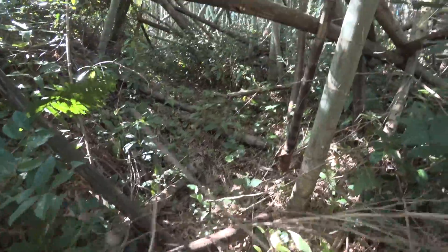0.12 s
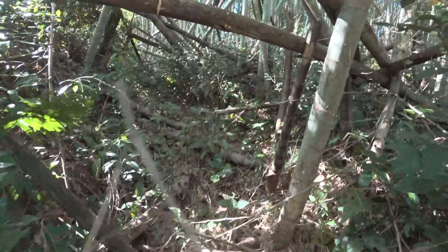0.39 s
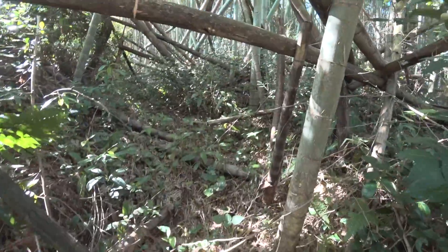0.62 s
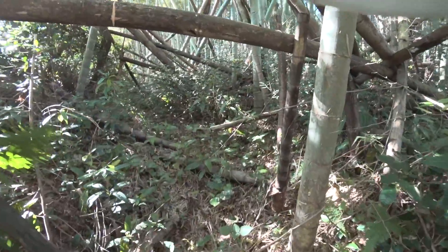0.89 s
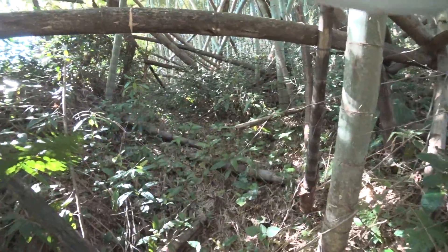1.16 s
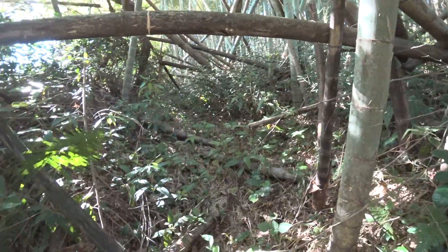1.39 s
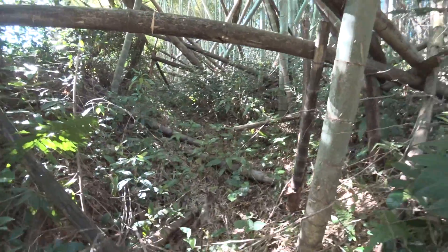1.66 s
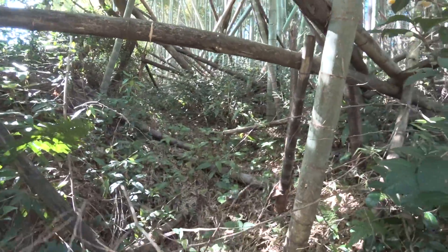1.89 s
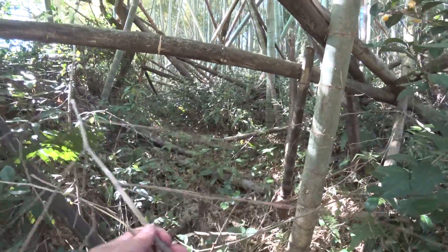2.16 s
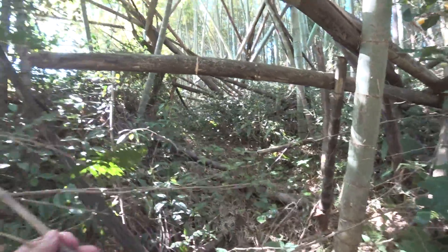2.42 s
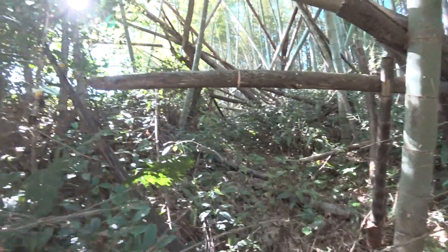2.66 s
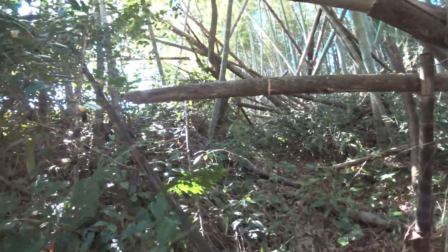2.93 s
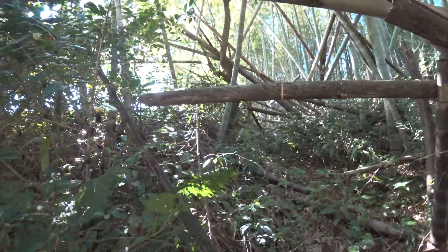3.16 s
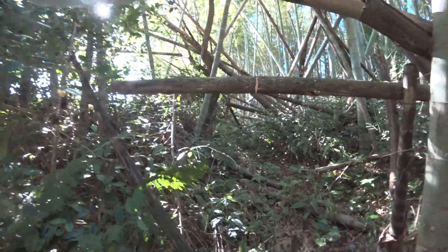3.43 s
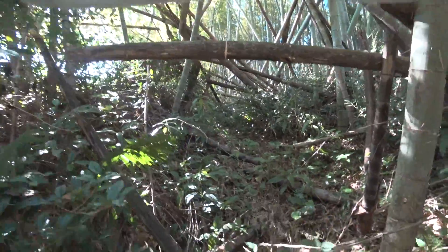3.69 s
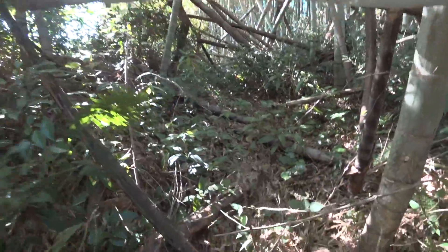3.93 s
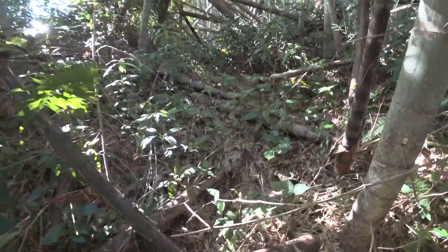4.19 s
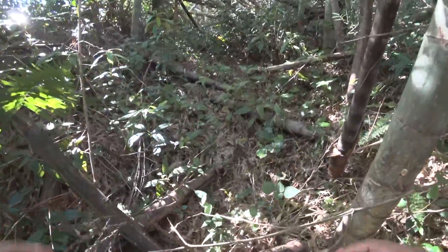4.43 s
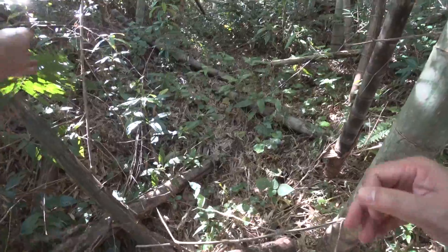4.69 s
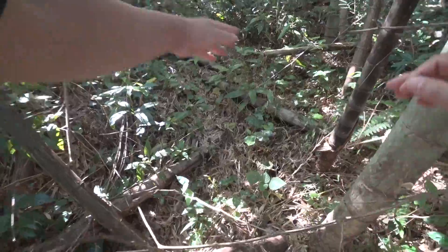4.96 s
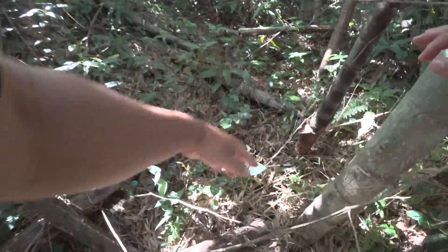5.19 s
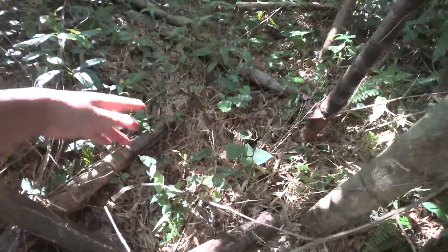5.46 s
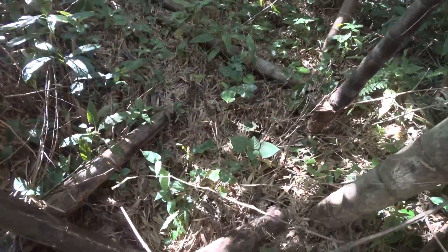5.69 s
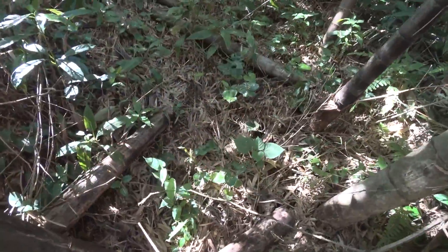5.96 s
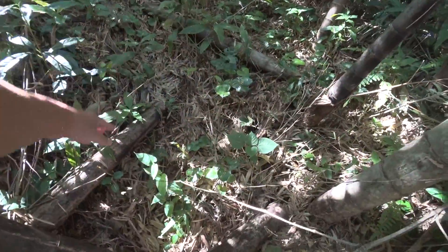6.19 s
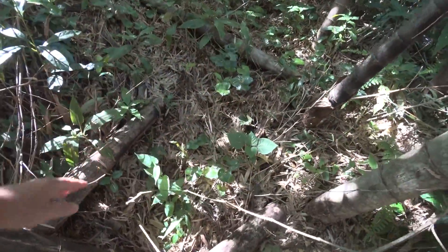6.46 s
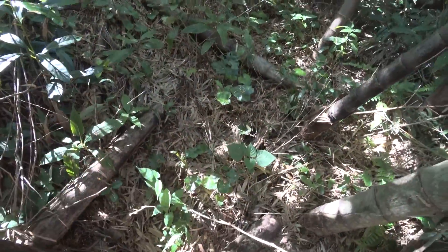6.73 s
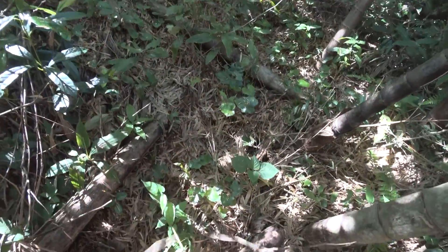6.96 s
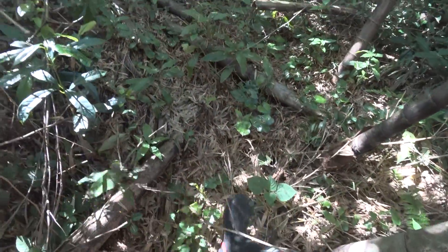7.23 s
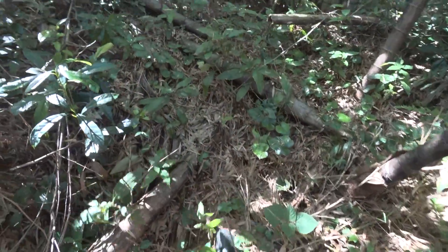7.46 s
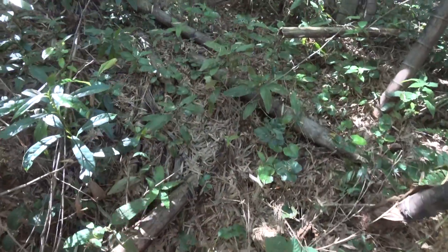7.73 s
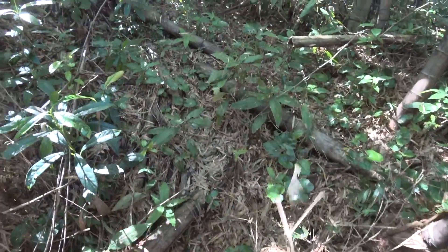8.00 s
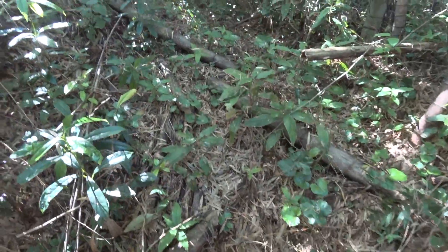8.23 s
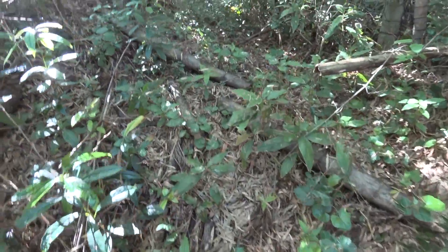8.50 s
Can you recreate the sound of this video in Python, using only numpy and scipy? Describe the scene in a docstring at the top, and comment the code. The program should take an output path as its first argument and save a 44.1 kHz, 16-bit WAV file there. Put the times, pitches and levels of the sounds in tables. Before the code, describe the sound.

Outdoors in a bamboo grove, heard from a small head-worn stereo microphone: thin in bass, softened at the very top, with a faint steady hiss throughout. From 0 to 1 s dry leaves rustle and crackle closely amid rapid bright twig snaps. It eases, with a barely audible creak near 1.4 s, then hollow stems crack at 1.6 to 1.8 s. Rustling swells around 2.6 to 3.6 s, with a strong woody knock at 3.7 s and more snaps until 4.6 s. From 4.7 to 6.6 s it is much quieter: faint brushing, small ticks, a tiny creak at 4.75 s, one isolated sharp snap at 5.5 s. Crunching resumes at 6.7 s; low hollow knocks and dense cracks cluster from 7.0 s, peaking in a loud leafy crunch near 7.4 s. After a brief dip, another crackling burst comes at 7.95 to 8.25 s, with a hard knock at 8.2 s, then near quiet and a last snap at 8.6 s.

```python
"""Dry bamboo litter rustles and crackles at once, close by, over a faint steady wash; twigs soon snap.
Someone wades through it and pushes dead branches aside, a small camera worn on the head.
Leaves are crackle bursts and hiss shaped by sweeps, twigs are coloured noise with a sharp crack,
hollow stems are partials set ringing by tearing noise, and creaks are stick-slip scrapes into stem modes.
The grove scatters snaps, knocks and creaks back; two microphone ports hear it all, bass cut, treble ending early."""
import sys
import numpy as np
from scipy import signal
from scipy.fft import rfft, irfft
from scipy.io import wavfile
from scipy.ndimage import uniform_filter1d

SR = 44100
rng = np.random.default_rng(int(sys.argv[2]) if len(sys.argv) > 2 else 0)


def nominal_scale(level):
    """Amplitude ratio for a level in decibels (scalar or array-like)."""
    x = np.asarray(level, float) / 20
    return 10 ** x


def wav_record(signal):
    """Record a signal, one row per channel, as 16-bit PCM in the file named by sys.argv[1]."""
    frames = np.transpose(np.atleast_2d(signal))
    bounded = np.clip(frames, -1, 1)
    # unit amplitude maps onto the largest positive 16-bit level
    quanta = np.round(bounded * 32767).astype(np.int16)
    wavfile.write(sys.argv[1], SR, quanta)


N = 380141  # length in samples


def evened(x):
    """Scales a signal to an rms of 1."""
    return x / np.sqrt(np.mean(x ** 2) + 1e-20)


def read(points, hz):
    """Reads a curve of (Hz, value) points along a logarithmic frequency axis."""
    f, value = np.transpose(points)
    return np.interp(np.log(hz + 1), np.log(f + 1), value)


def add(mix, s, sound):
    """Lays a sound into the mix from second s, cut at the end."""
    part = mix[:, round(s * SR):][:, :sound.shape[1]]
    part += sound[:, :part.shape[1]]


def sided(sound, pan_db):
    """Places a sound by level alone: pan_db is left over right."""
    return sound * nominal_scale(np.array([[.5], [-.5]]) * pan_db)


def below(hz, knee_hz=1700):
    """1 in the low range, 0 in the treble."""
    return 1 / (1 + (hz / knee_hz) ** 4)


def causal(gain_db):
    """Minimum phase: an impulse response of this colour with its energy as early as possible."""
    log_gain = np.log(nominal_scale(np.r_[gain_db, gain_db[-2:0:-1]]))
    return np.fft.ifft(np.exp(np.conj(signal.hilbert(log_gain)))).real


# A foot, hand or branch sweeping through leaves. Each row: loudest moment in seconds, seconds to rise 10 dB,
# seconds to fall 10 dB (both at least 5 ms, then stretched by lingers), level in dB, weight below 1.7 kHz in dB.
SWEEPS = [(0.0, .05, 0.07, -27.5, -7.5), (0.13, 0.7, 0.4, -28.5, -9), (0.447, 0.08, 0.25, -26.5, -6),
          (0.69, 0, 0.22, -28, -9.5), (1.18, 0, 1.5, -43, -6.5), (1.4, 0.2, 0, -40.5, -1),
          (1.669, 0.07, 0.06, -29.5, -6), (1.84, 0, 0.0356, -26.5, -1), (1.99, 0.1, 0.03, -33, -14.5),
          (2.094, 0.03, -0.05, -29.5, -23), (2.2, 0.66, 0.5, -42, -4.5), (2.64, 0.25, 0.17, -26, -8),
          (2.761, -0.01, 0.15, -30, -7), (2.948, 0.08, 0.06, -30, -9.5), (3.067, 0.035, 0.08, -25, -13.5),
          (3.39, 0.19, 0.17, -33.5, -8.5), (3.569, 0.25, 0.22, -27.5, -9), (3.899, -0.1, -0.06, -33.5, 2.5),
          (4.16, 0.11, 0.13, -34.5, -3), (4.442, 0.09, -0.01, -33.5, -5.5), (4.541, 0.5, 0.14, -44.5, -5),
          (4.578, 0.05, 0.04, -32, 0), (4.74, 0.16, 0.26, -51.5, 6), (4.87, 0.14, 0.16, -43.5, -12.5),
          (5.0, 0, 0.11, -44, -8.5), (5.106, 0.16, 0.12, -38.5, -6.5), (5.29, 0.05, 0.3, -44, -11),
          (5.76, -0.25, 0.1, -44, -11), (6.1, 0.67, 0.14, -50.5, -2), (6.489, 0.02, 1.5, -41.5, -8),
          (6.7, 0.1058, -0.1, -32.5, -6), (6.78, 0.1023, -0.01, -32, 0.5), (7.093, 0.12, 0.5, -32, 1.5),
          (7.18, 0.0748, -0.25, -41.5, 10), (7.26, 0.0328, 0.01, -30.5, -4.5),
          (7.359, 0.04, 0.04, -19.5, -3.5), (7.469, -0.05, 0.0154, -26, -24), (7.68, 0.05, 0, -42, -11.5),
          (7.965, -0.0474, 0.09, -25.5, -1.5), (8.09, 0.02, -0.02, -38, -8.5),
          (8.21, -0.03, 0.08, -33, -5.5), (8.62, 0.06, -1, -44.5, 0)]


def stirring_db(t, peaks_db, lingers=1):
    """Level of all sweeps together: each rises to its peak and falls away, their powers add."""
    at, rise, fall = np.transpose(SWEEPS)[:3, :, None]
    before = (at - t) / np.maximum(rise, .005)
    after = (t - at) / np.maximum(fall, .005)
    away = np.where(t < at, before, after)
    each_db = peaks_db[:, None] - 10 * away / lingers
    return 10 * np.log10(nominal_scale(2 * each_db).sum(0))


def crackle(per_s, spread_db, clump_db, width, longest_s, count=40):
    """Leaf fractures: short bursts of many colours and directions, coming in clumps."""
    clumps = nominal_scale(clump_db * evened(uniform_filter1d(rng.standard_normal(N), 500)))
    strength = nominal_scale(spread_db * np.minimum(rng.exponential(1, N), 4))
    breaks = strength * (rng.random(N) < per_s * clumps / SR)
    kind = rng.integers(0, count, N)
    t, hz = np.arange(1024) / SR, np.fft.rfftfreq(1024, 1 / SR)
    out = np.zeros((2, N))
    for k in range(count):
        centre_hz = 450 * 24 ** rng.random()
        t60 = longest_s * rng.uniform(0.5, 1)
        pan_db = 3 * rng.standard_normal()
        hump = 0.37 + np.exp(-(np.log((hz + 1) / centre_hz) / width) ** 2)
        coloured = irfft(rfft(rng.standard_normal(1024)) * hump)
        burst = evened(coloured * nominal_scale(-60 * t / t60))
        out += sided(signal.oaconvolve(breaks * (kind == k), burst)[:N], pan_db)
    return evened(out)


# Colour of the stirred leaves. Each row: frequency in Hz, relative level in dB per Hz.
LEAF = [(24, -67), (40, -13), (191, -49), (427, -6.5), (610, -15), (870, -14), (1430, -7), (1950, -9),
        (2650, 2), (3600, 2.5), (5500, 4), (9290, -2), (10500, 2.5), (11500, -6.5), (15000, -37),
        (22000, -120)]
# Where the stirring is; near leaves are brighter.
# Each row: time in seconds, left over right in dB, sheen above 5.5 kHz in dB.
PLACE = [(0.0, 0.5, 4), (0.4, -2, -5), (1.08, -0.5, -2), (1.66, 1, -2.5), (1.9, 0.5, -2), (2.1, 1.5, 4.5),
         (2.6, -5.5, -7.5), (3.08, 2.5, 1.5), (3.6, 3, -4.5), (4.44, 0, -4.5), (4.78, -2.5, 2.5),
         (5.05, 1, -0.5), (5.35, 1.1, -4), (5.7, 0, -4), (6.7, -0.84, -6.5), (7.2, -2, 1.5),
         (7.6, 0.5, 4.5), (8.0, -1, -6), (8.62, -2.1, -3.5)]
WEIGHT_LINGERS, SHEEN_LINGERS = 0.92, 1.053  # swell and fade times of low and high range, middle = 1
USUAL_WEIGHT_DB = -14.5  # a sweep of this weight keeps the leaf colour's own lows


def rustle(hiss_db=-7, crackle_db=-2, tick_db=-9, patchy_db=1.6, flicker_db=1.1):
    """Sliding leaves hiss in patches under the crackle; both take the colour and level of the sweeps."""
    leaves = nominal_scale(crackle_db) * crackle(1200, spread_db=2.5, clump_db=2, width=0.24, longest_s=0.022)
    # dry ticks
    leaves += nominal_scale(tick_db) * crackle(80, spread_db=2.5, clump_db=2, width=0.8, longest_s=0.005, count=20)
    leaves += nominal_scale(hiss_db) * rng.standard_normal(N)
    hz, t, z = signal.stft(leaves, SR, nperseg=256, noverlap=192)

    grain = rng.standard_normal((len(t), len(hz)))
    patches = evened(uniform_filter1d(uniform_filter1d(grain, 14, 0), 8, 1)).T
    flicker = evened(uniform_filter1d(rng.standard_normal(len(t)), 8))

    *_, peaks_db, weights_db = np.transpose(SWEEPS)
    s, *columns = np.transpose(PLACE)
    pan_db, sheen_db = (np.interp(t, s, c) for c in columns)
    level_db = stirring_db(t, peaks_db)
    low_db = stirring_db(t, peaks_db + weights_db, WEIGHT_LINGERS) - USUAL_WEIGHT_DB
    high_db = stirring_db(t, peaks_db, SHEEN_LINGERS) + sheen_db

    colour_db = read(LEAF, hz)
    # level the colour by its power in bins 12 to 63, about 2 to 11 kHz
    colour_db = colour_db - 10 * np.log10(np.mean(nominal_scale(2 * colour_db[12:64])) * 52 / len(hz))
    field_db = colour_db[:, None] + level_db
    field_db += below(hz)[:, None] * (low_db - level_db)
    field_db += (1 - below(hz, knee_hz=5500))[:, None] * (high_db - level_db)
    field_db += patchy_db * patches + flicker_db * flicker
    z *= nominal_scale(field_db + np.array([.5, -.5])[:, None, None] * pan_db)
    return signal.istft(z, SR, nperseg=256, noverlap=192)[1][:, :N]


# Far leaves and microphone hiss. Each row: frequency in Hz, relative level in dB per Hz.
STILL = [(15, -59), (25, -29), (456, -9), (1060, -5), (1950, -7), (5970, 0), (11000, -15), (14300, -45),
         (22000, -120)]


def still():
    """The steady faint wash under everything: coloured noise, mostly independent at the two ports."""
    hz = np.fft.rfftfreq(N, 1 / SR)
    noise = rng.standard_normal(N) + 3.0 * rng.standard_normal((2, N))
    wash = irfft(rfft(noise) * nominal_scale(read(STILL, hz)), N)
    return nominal_scale(-52.5) * evened(wash)


def rumble():
    """The camera mount shakes a little with the walker's movement: lumpy, very low noise."""
    t = np.arange(0, N, 256) / SR
    *_, peaks_db, weights_db = np.transpose(SWEEPS)
    low_db = stirring_db(t, peaks_db + weights_db, WEIGHT_LINGERS)
    shake_db = np.interp(np.arange(N) / SR, t, low_db)
    lumps_db = 5 * evened(uniform_filter1d(rng.standard_normal(N), 2000))
    noise = rng.standard_normal(N) + 0.35 * rng.standard_normal((2, N))
    band = signal.butter(2, [45, 137], "band", fs=SR, output="sos")  # Hz
    low = evened(signal.sosfilt(band, noise))
    return low * nominal_scale(-55.5 + 0.64 * shake_db + lumps_db)


# Twigs and leaf ribs breaking close by. Each row: start in seconds, peak of the 3 ms rms in dB,
# brightest frequency in Hz, tail's 60 dB decay in seconds (held to 0.006-0.2), left over right in dB.
SNAPS = [(0.0752, -22, 5640, 0.088, -6), (0.109, -18, 5580, 0.07, -5), (0.1422, -13, 5150, 0.037, 3),
         (0.2091, -9.5, 4200, 0.013, 7), (0.2714, -15.5, 2800, 0.053, -1), (0.302, -25.5, 8500, 0.04, -2),
         (0.365, -26, 8600, 0.015, 1), (0.444, -21, 9600, 0.03, 4.5), (0.4575, -9.5, 5760, 0.021, 8),
         (0.552, -19, 3430, 0.02, -3), (0.5854, -11, 5600, 0.017, 1), (0.6627, -22, 2980, 0.095, -13),
         (0.727, -11, 3420, 0.0077, 3), (0.7529, -13.5, 3300, 0.015, 1), (0.813, -21.5, 3220, 0.052, 6),
         (0.9767, -25.5, 4440, 0.027, 1), (1.1735, -28, 5830, 0.052, -1), (1.2722, -15, 4930, 0.024, -1),
         (1.4678, -25.5, 4300, 0.053, -5), (1.5767, -11, 2500, 0.072, 3.5), (1.635, -31, 3400, 0.02, 0),
         (1.645, -16.5, 3600, 0.03, 5), (1.6545, -13.5, 6540, 0.033, -1), (1.666, -16, 2900, 0.029, 13),
         (1.69, -10, 4700, 0.047, 3), (1.738, -27, 4550, 0.053, 4), (1.8035, -21, 3300, 0.042, 2),
         (1.8149, -10.5, 5500, 0.074, 2), (1.9785, -23.5, 6000, 0.16, 4), (2.0107, -23.5, 5300, 0.13, 7),
         (2.2146, -29.5, 2550, 0.17, -11), (2.4328, -24, 7060, 0.008, 2), (2.4455, -25, 6100, 0.041, 19),
         (2.4868, -25, 6160, 0.03, 13), (2.6062, -18, 7500, 0.0092, 7), (2.638, -21, 4150, 0.039, -9),
         (2.8, -22.5, 3000, 0.01, -2), (2.833, -23, 7140, 0.026, -3), (2.935, -15, 5800, 0.023, 1),
         (2.9438, -17, 4960, 0.011, 2), (2.985, -16.5, 8800, 0.034, 2.5), (3.0545, -15.5, 5360, 0.073, 3),
         (3.211, -15.5, 5850, 0.016, 0), (3.372, -32, 5000, 0.02, -14), (3.491, -24.5, 4870, 0.2, 10.5),
         (3.531, -25, 3000, 0.055, 17), (3.683, -21.5, 2300, 0.014, -3.5), (3.8068, -23, 4470, 0.025, 4),
         (3.8526, -21.5, 4140, 0.021, -2), (3.8839, -23.5, 4600, 0.026, -0.5),
         (3.902, -15, 4640, 0.012, -3), (3.918, -10.5, 3300, 0.0086, -1), (3.9448, -28, 1580, 0.015, 0),
         (4.013, -19, 2200, 0.011, -1), (4.058, -18.5, 2980, 0.0069, -2.5),
         (4.126, -28.5, 3600, 0.0073, -2.5), (4.1394, -27, 2370, 0.011, -1),
         (4.1458, -12.5, 4400, 0.085, -4.5), (4.2197, -19, 2650, 0.016, 4),
         (4.2236, -23.5, 5900, 0.026, -5.5), (4.455, -13.5, 5800, 0.0084, 0),
         (4.5535, -19, 4540, 0.029, -11), (4.5549, -11, 4560, 0.041, -4), (4.889, -34.5, 3500, 0.027, -9),
         (5.019, -26.5, 4170, 0.012, 4), (5.105, -33, 6460, 0.019, 7), (5.492, -25.5, 3030, 0.007, 3),
         (5.4938, -10.5, 6600, 0.013, 4.5), (5.747, -32.5, 4440, 0.027, 5),
         (5.7519, -31.5, 4100, 0.047, -6), (6.04, -36.5, 5100, 0.025, -9.5), (6.083, -41, 4000, 0.023, -8),
         (6.2058, -38.5, 5700, 0.028, -6.5), (6.348, -38, 5940, 0.05, -0.5), (6.4419, -33, 5130, 0.022, 1),
         (6.6947, -17.5, 3840, 0.04, -2), (6.7641, -20.5, 2500, 0.045, 0), (6.797, -27.5, 1520, 0.035, 8),
         (7.0384, -10, 2170, 0.024, 2), (7.076, -20.5, 1900, 0.049, 12.5), (7.0882, -10.5, 1700, 0.05, -4),
         (7.114, -21, 1500, 0.03, 2), (7.1219, -20.5, 4240, 0.085, -2), (7.1404, -21, 6440, 0.031, 5),
         (7.159, -34, 2800, 0.015, 0), (7.1746, -14, 4300, 0.031, -3), (7.2318, -24, 3660, 0.017, -1),
         (7.2406, -11, 4000, 0.027, 0), (7.268, -15.5, 2300, 0.024, 2), (7.2765, -12.5, 4930, 0.034, 7),
         (7.319, -18.5, 3870, 0.046, 0), (7.339, -13, 6340, 0.11, 3), (7.4677, -23, 4620, 0.13, 1),
         (7.567, -34, 8000, 0.02, 0), (7.6753, -36.5, 6670, 0.011, -14), (7.736, -27, 2070, 0.037, 3),
         (7.8057, -25, 6740, 0.017, 0), (7.878, -38, 5640, 0.043, 3), (7.9514, -10, 3600, 0.11, -5),
         (7.9763, -10.5, 3300, 0.047, -5), (8.0071, -17.5, 3640, 0.088, -5),
         (8.0161, -11.5, 2440, 0.094, -5.5), (8.0556, -13.5, 5200, 0.076, -7),
         (8.0624, -17, 3330, 0.052, -10), (8.0836, -20.5, 3200, 0.028, -16),
         (8.09, -12.5, 3180, 0.049, -5.5), (8.1338, -28, 2860, 0.032, -3), (8.1578, -26, 3170, 0.021, -4.5),
         (8.1743, -17.5, 2970, 0.019, -2), (8.1965, -17, 5500, 0.021, 3), (8.2097, -19.5, 4240, 0.019, -1),
         (8.2228, -27.5, 4520, 0.02, -2), (8.2492, -19.5, 4370, 0.01, 0.0), (8.3811, -38, 5080, 0.03, -1),
         (8.6154, -16, 5650, 0.15, -4)]
# Colour of a twig that is brightest at 4200 Hz. Each row: frequency in Hz, gain in dB.
TWIG = [(200, -32), (600, -10), (1500, 2), (3500, 7), (7000, 4), (11000, -2)]
SIZE_SHIFT = .35  # how far a piece's size moves the whole twig colour, as a power of its brightest pitch


def snap(peak_db, bright_hz, t60, pan_db):
    """A sharp crack, then fibres tearing in a ragged tail; the piece's size sets its colour."""
    t, hz = np.arange(4096) / SR, np.fft.rfftfreq(2048, 1 / SR)
    ragged_db = 3 * evened(uniform_filter1d(rng.standard_normal(4096), 40))
    tail = nominal_scale(ragged_db - 60 * t / np.clip(t60, .006, .2))
    crack = 3.7 * nominal_scale(-60 * t / 0.0035)
    onset = np.minimum(t / 0.00053, 1)
    burst = rng.standard_normal(4096) * (crack + tail) * onset
    burst[12] += 15  # the instant of the break
    colour_db = read(TWIG, hz * (4200 / bright_hz) ** SIZE_SHIFT)
    colour_db += 8 * np.exp(-(np.log((hz + 1) / bright_hz) / 0.3) ** 2)
    # each piece rings at its own pitches
    colour_db += 3 * evened(uniform_filter1d(rng.standard_normal(len(hz)), 14))
    sound = signal.fftconvolve(burst, causal(colour_db)[:512])
    loudest = np.sqrt(uniform_filter1d(sound ** 2, 130).max())
    return sided(nominal_scale(peak_db) * sound / loudest, pan_db)


def grove(x):
    """Stems and ground scatter each sound back within a tenth of a second: sparse, decaying echoes."""
    t = np.arange(8192) / SR
    echoes = rng.standard_normal((2, 8192)) * (rng.random((2, 8192)) < .1)
    tail = echoes * nominal_scale(-60 * t / 0.12) * (t > .003)  # t60 0.12 s, nothing in the first 3 ms
    tail += 0.092 * tail.sum(0)  # a small share of the echoes is common to both ports
    return signal.oaconvolve(x, tail / np.linalg.norm(tail[0]), axes=1)[:, :N]


# Hollow stems knocked or trodden. Each row: start in seconds, level in dB (the peak lies 3 dB above),
# pitch in Hz, 60 dB decay of the tearing in seconds (held to 0.005-0.15).
KNOCKS = [(0.141, -31.5, 546, 0.053), (0.727, -20, 1150, 0.068), (1.116, -53.5, 327, 0.17),
          (1.58, -14.5, 1050, 0.069), (1.655, -21.5, 1020, 0.13), (1.8159, -16, 1110, 0.11),
          (2.558, -27, 1220, 0.041), (2.633, -27.5, 880, 0.014), (3.391, -24.5, 1150, 0.059),
          (3.6804, -11.5, 1850, 0.027), (3.919, -21.5, 1210, 0.04), (4.0125, -19.5, 1290, 0.05),
          (4.2194, -27, 1180, 0.052), (4.453, -24, 1370, 0.014), (4.557, -22, 1650, 0.079),
          (4.557, -29, 960, 0.15), (4.615, -39, 624, 0.09), (4.655, -44.5, 620, 0.03),
          (4.71, -48, 450, 0.06), (4.743, -40, 624, 0.086), (4.89, -46.5, 704, 0.02),
          (4.925, -50, 520, 0.082), (5.042, -42, 620, 0.051), (5.1223, -41.5, 900, 0.011),
          (5.384, -55, 274, 0.012), (5.4938, -30, 880, 0.013), (5.524, -41, 480, 0.099),
          (6.299, -41.5, 1110, 0.028), (6.765, -23.5, 1150, 0.023), (6.981, -25.5, 430, 0.097),
          (7.042, -15, 486, 0.064), (7.056, -23, 467, 0.085), (7.074, -27, 386, 0.042),
          (7.081, -11.5, 506, 0.038), (7.097, -18.5, 520, 0.026), (7.124, -16.5, 820, 0.053),
          (7.135, -23.5, 480, 0.1), (7.21, -28.5, 420, 0.15), (7.224, -26.5, 726, 0.027),
          (7.337, -26, 510, 0.15), (7.3814, -10.5, 1310, 0.055), (7.384, -17.5, 565, 0.054),
          (7.737, -29.5, 1350, 0.023), (7.955, -21, 1160, 0.17), (8.019, -21.5, 1170, 0.14),
          (8.134, -33.5, 1010, 0.016), (8.197, -8, 1430, 0.062), (8.597, -38, 950, 0.019)]
# Tube and wall partials of a stem. Each row: ratio to the pitch, level in dB.
STEM = [(1, 0), (1.35, -10), (1.9, -12)]
RING_CYCLES = 9  # cycles a split stem's partial rings before dying 60 dB


def knock(peak_db, hz, t60):
    """The stem splits over a few hundredths of a second; each tear sets its air and wall briefly ringing."""
    t = np.arange(4096) / SR
    ring = np.zeros(4096)
    for ratio, db in STEM:
        partial_hz = hz * ratio
        ring += nominal_scale(db - 60 * t * partial_hz / RING_CYCLES) * np.sin(2 * np.pi * partial_hz * t)
    tears = rng.standard_normal(4096) * nominal_scale(-60 * t / np.clip(t60, .005, .15))
    tears[0] += 15  # the first give
    thin = signal.butter(2, 0.6 * hz, "high", fs=SR, output="sos")  # little sounds below about 0.6 of the pitch
    sound = signal.sosfilt(thin, signal.fftconvolve(ring, tears))
    return sided(nominal_scale(peak_db) * np.sqrt(2) * sound / abs(sound).max(), 0)


# A bent stem slipping. Each row: start in seconds, end in seconds, slips per second, rms level in dB.
CREAKS = [(1.434, 1.56, 50, -50), (4.75, 4.815, 130, -49)]
# Modes of the bent stem. Each row: frequency in Hz, width in Hz, level in dB.
CREAK_MODES = [(430, 110, -10), (620, 90, 0), (1150, 120, 0), (1600, 180, -7)]


def creak(start, end, per_s, db):
    """Stick-slip: unevenly timed short scrapes set the stem's modes ringing."""
    t = np.arange(2048) / SR
    body = np.zeros(2048)
    for mode_hz, width_hz, mode_db in CREAK_MODES:
        body += nominal_scale(mode_db) * np.exp(-np.pi * width_hz * t) * np.sin(2 * np.pi * mode_hz * t)
    slim = signal.butter(3, 380, "high", fs=SR, output="sos")  # slim stem, no bass
    body = signal.sosfilt(slim, body)
    chance = rng.standard_normal((40, 2))
    at = (np.arange(40) + 0.15 * abs(chance[:, 0])) / per_s
    inside = (at >= 0) & (at < end - start)
    slips = np.zeros(round((end - start) * SR) + 1)
    slips[(at[inside] * SR).astype(int)] = nominal_scale(2 * chance[inside, 1])
    scrapes = signal.fftconvolve(slips, nominal_scale(-60 * t / .02))  # each slip dies 60 dB in 20 ms
    scrapes *= rng.standard_normal(len(scrapes))
    return sided(nominal_scale(db) * evened(signal.fftconvolve(scrapes, body)), 0)


def scene():
    """Snaps, knocks and creaks with the grove's echoes, and the rustling leaves around them."""
    wood = np.zeros((2, N))
    for s, *row in SNAPS:
        add(wood, s, snap(*row))
    for s, *row in KNOCKS:
        add(wood, s, knock(*row))
    for row in CREAKS:
        add(wood, row[0], creak(*row))
    return wood + nominal_scale(-18.5) * grove(wood) + rustle()


# Likeness of the two ports. Each row: frequency in Hz, left-right likeness (1 = identical phase).
SAME = [(60, .97), (350, .98), (1000, .8), (4000, .84), (11000, .5)]
# Steady phase between the ports. Each row: frequency in Hz, radians by which the left leads.
LEAD = [(60, .4), (250, .45), (690, .9), (1400, .95), (2600, .75), (4300, .6), (11900, .5)]


def ports(x):
    """The left port leads by a steady phase that also wanders at random over time and frequency,
    as sounds reach the ports from differing directions."""
    hz, t, z = signal.stft(x, SR, nperseg=512)
    drift = rng.standard_normal((len(t), len(hz)))
    wander = evened(uniform_filter1d(uniform_filter1d(drift, 12, 0), 30, 1)).T
    # phase spread in radians that leaves this likeness
    spread = np.sqrt(-2 * np.log(np.clip(read(SAME, hz), .05, .99)))
    lead = read(LEAD, hz)[:, None] + spread[:, None] * wander
    z *= np.exp(.5j * np.array([lead, -lead]))
    return signal.istft(z, SR, nperseg=512)[1][:, :N]


def roll_off(x):
    """The treble ends steeply here."""
    return signal.sosfilt(signal.butter(12, 12340, fs=SR, output="sos"), x)


def record(dry):
    """Port pair on the head, soft ceiling, steep bass cut, mount rumble and faint wash, early treble limit."""
    ceiling = .65  # of full scale
    heard = ceiling * np.tanh(ports(dry) / ceiling)
    bass_cut = signal.butter(6, 192, "high", fs=SR, output="sos")  # Hz
    heard = signal.sosfilt(bass_cut, heard) + rumble() + still()
    edge = signal.firwin(255, 11186, window=("kaiser", 3), fs=SR)  # low-pass, Hz
    mix = signal.oaconvolve(heard, edge[None], "same")
    return roll_off(mix)


dry = scene()
out = record(dry)
wav_record(out)
```